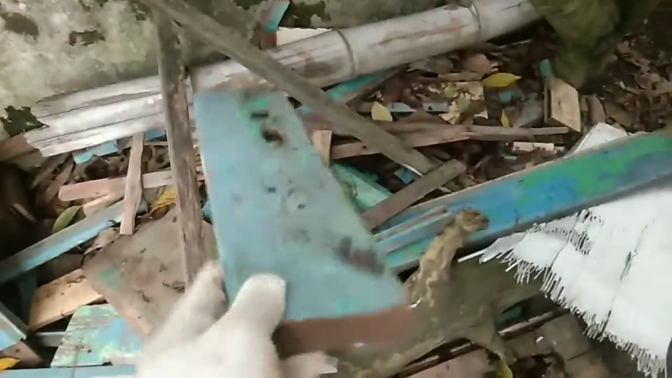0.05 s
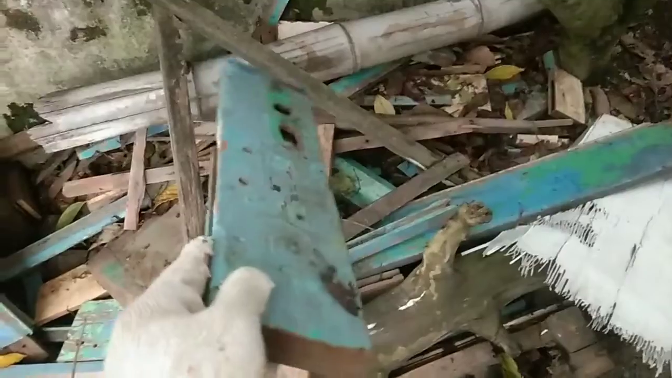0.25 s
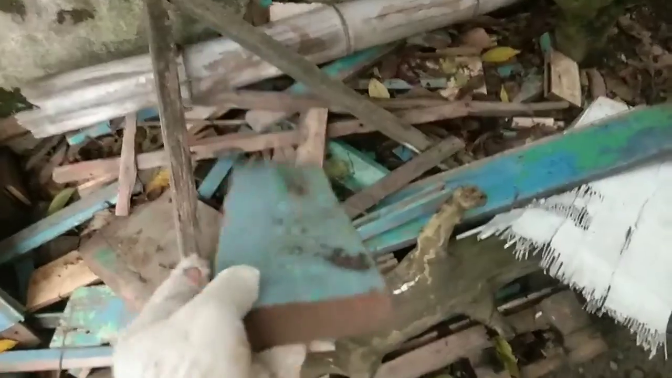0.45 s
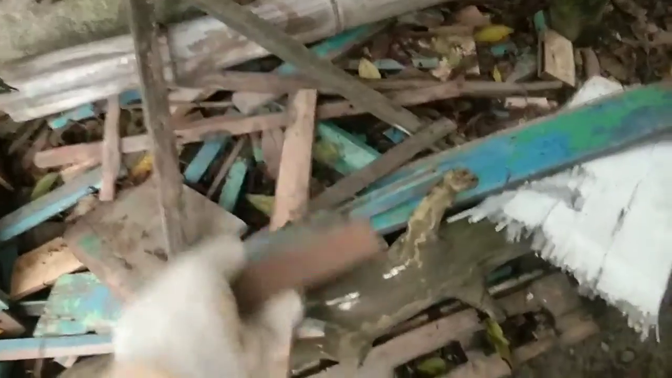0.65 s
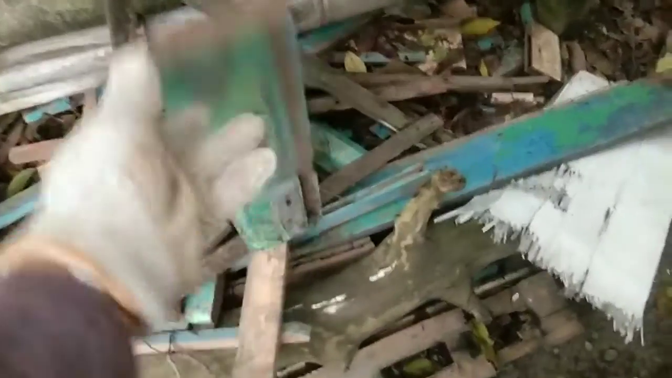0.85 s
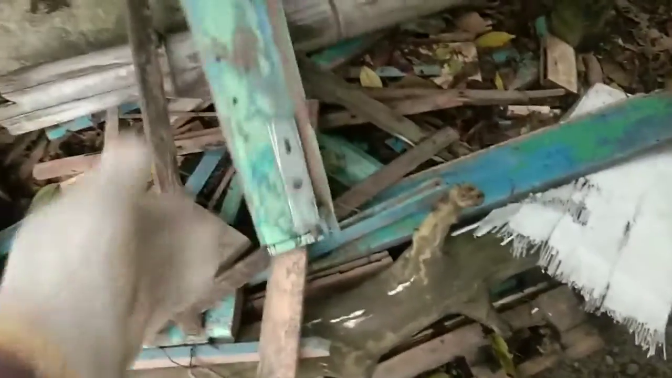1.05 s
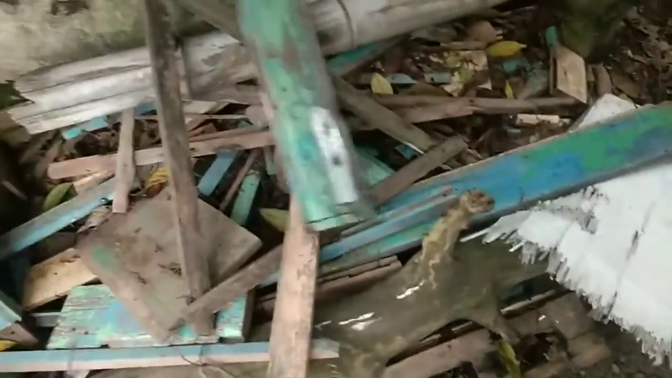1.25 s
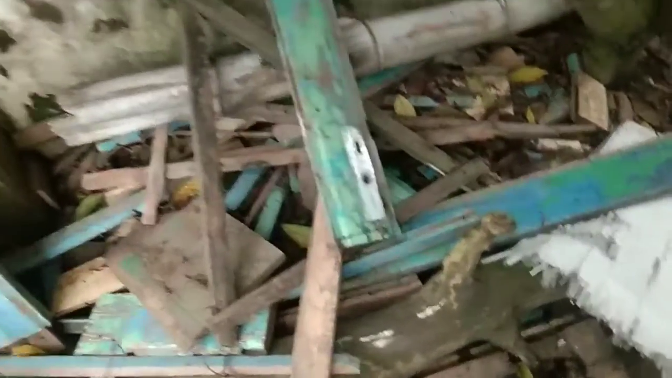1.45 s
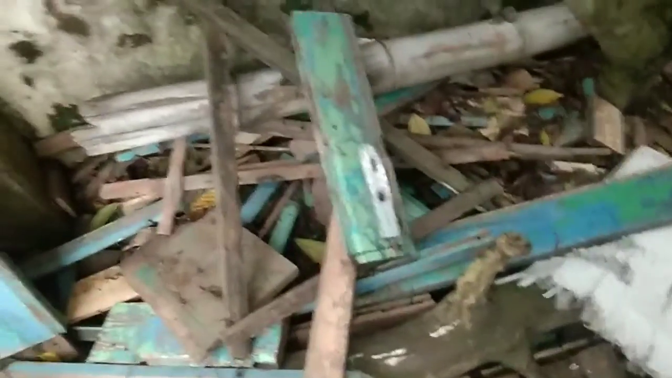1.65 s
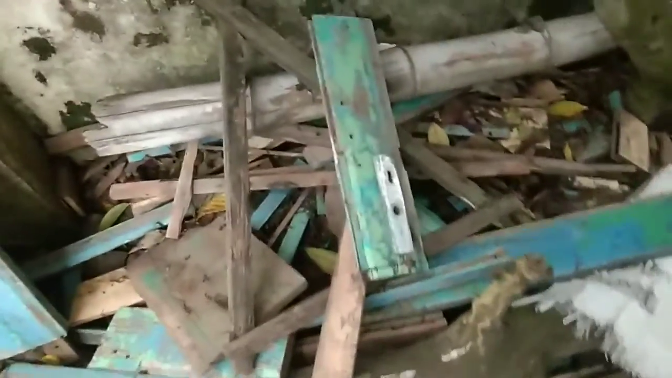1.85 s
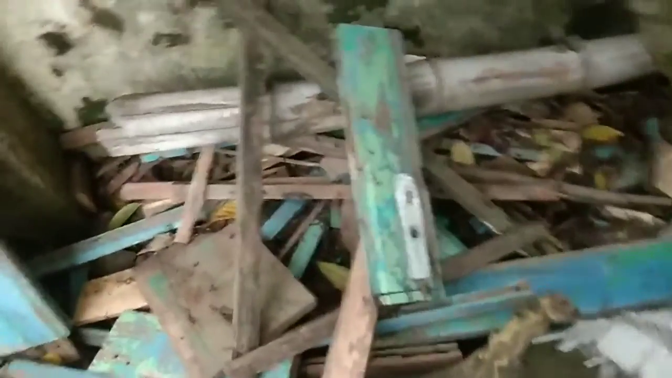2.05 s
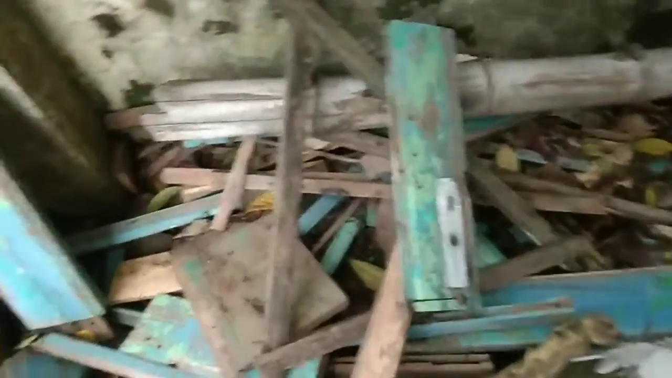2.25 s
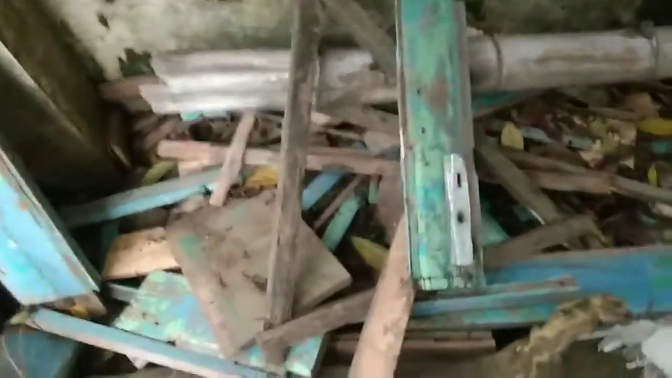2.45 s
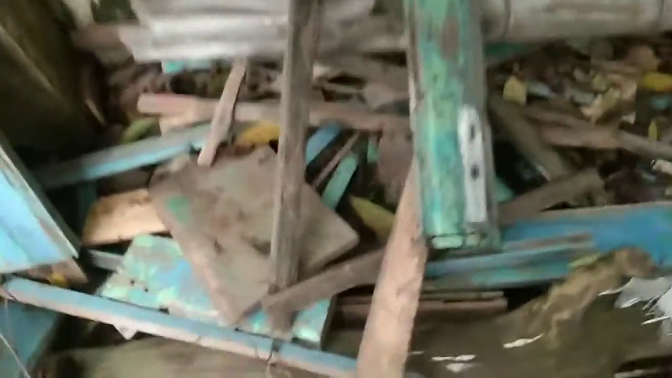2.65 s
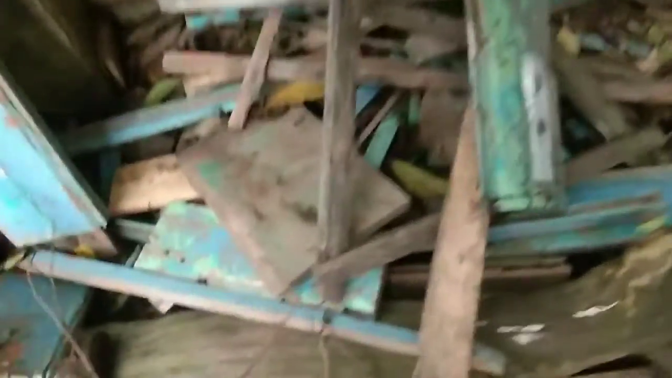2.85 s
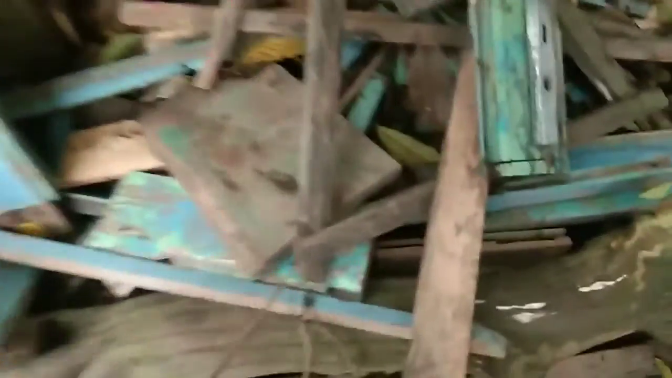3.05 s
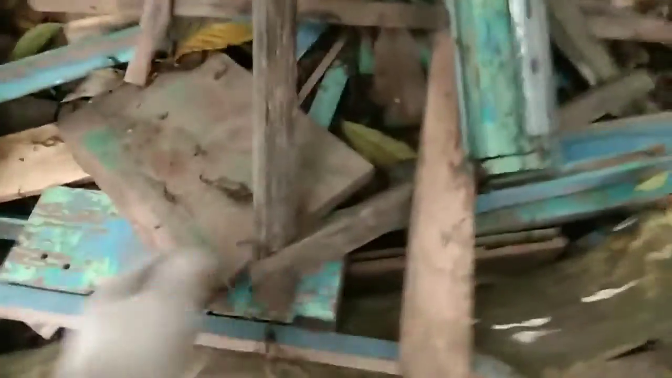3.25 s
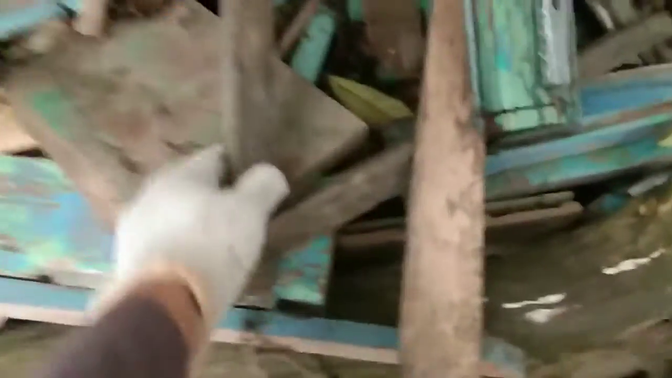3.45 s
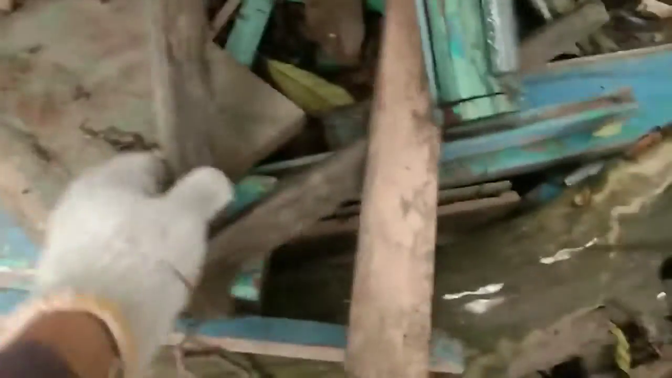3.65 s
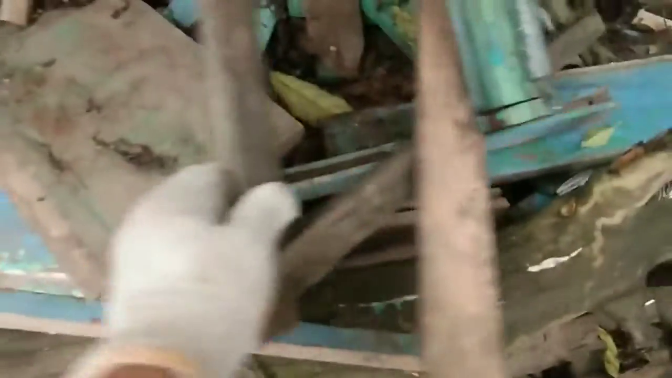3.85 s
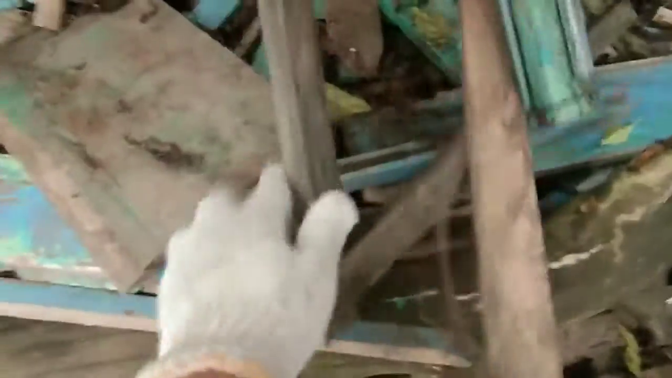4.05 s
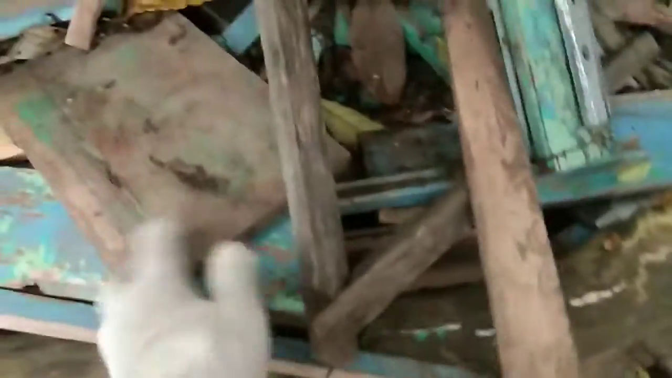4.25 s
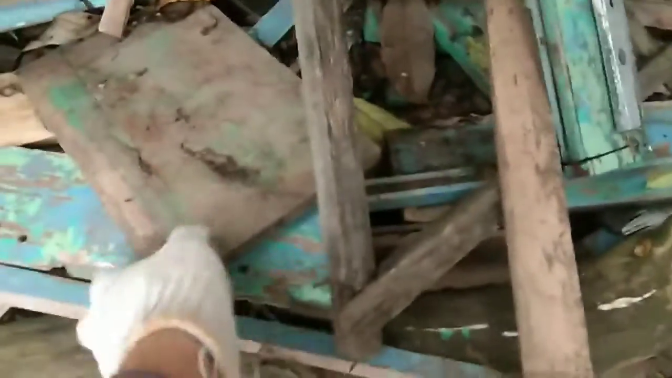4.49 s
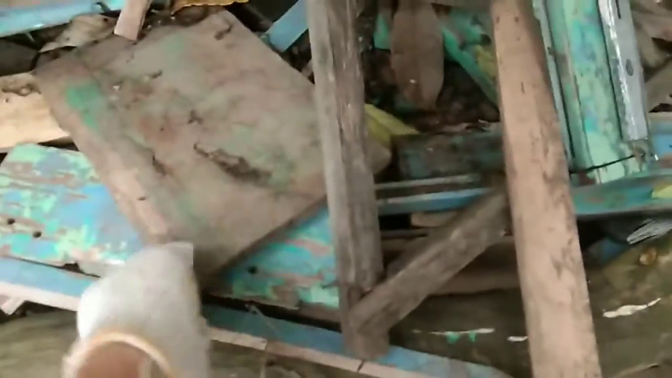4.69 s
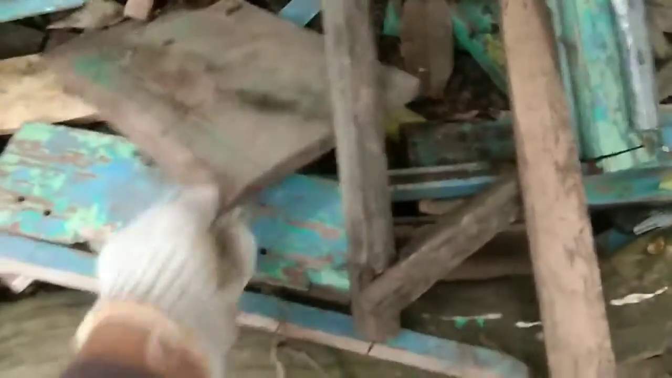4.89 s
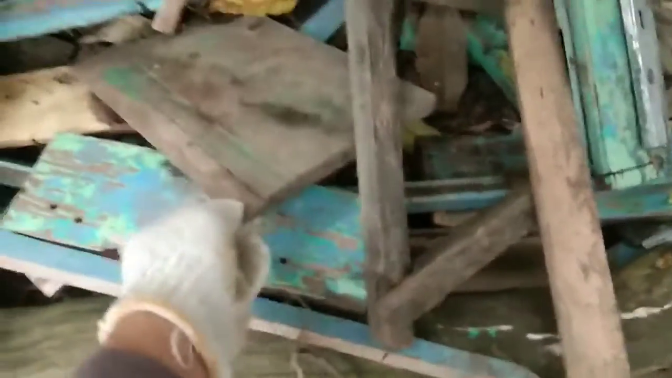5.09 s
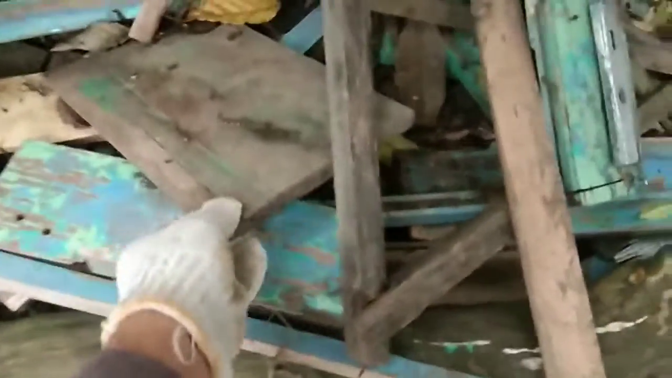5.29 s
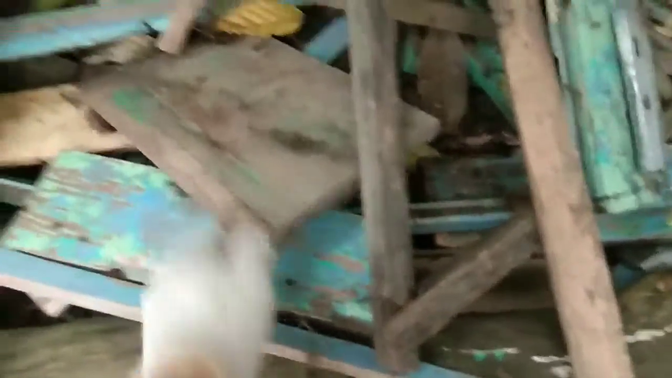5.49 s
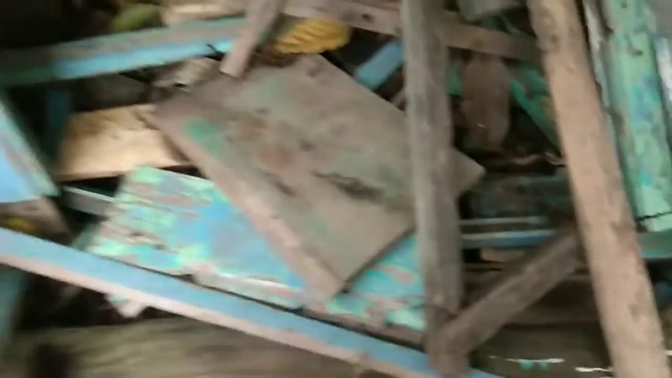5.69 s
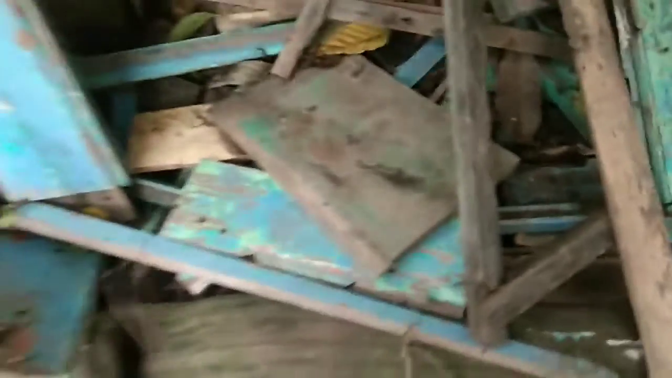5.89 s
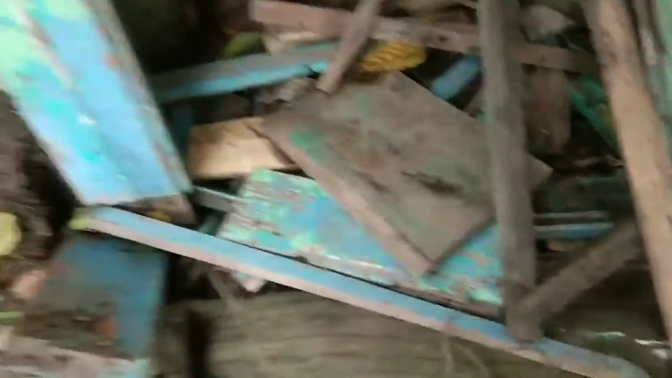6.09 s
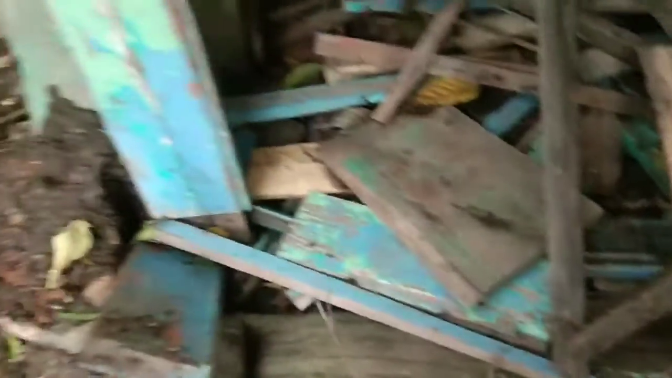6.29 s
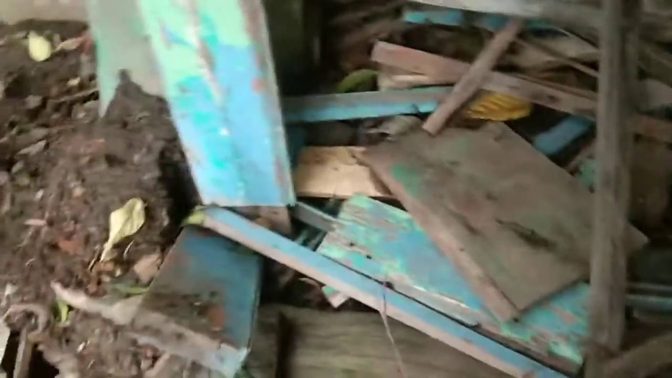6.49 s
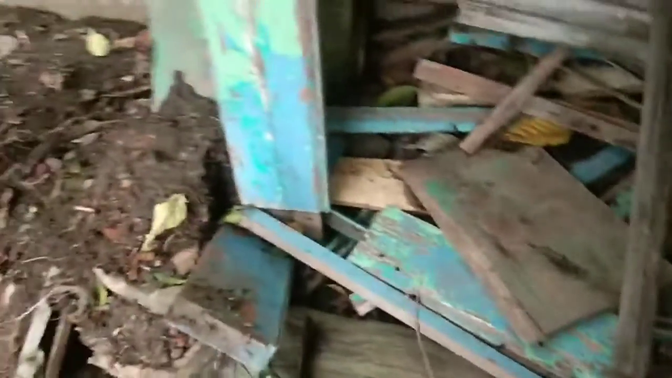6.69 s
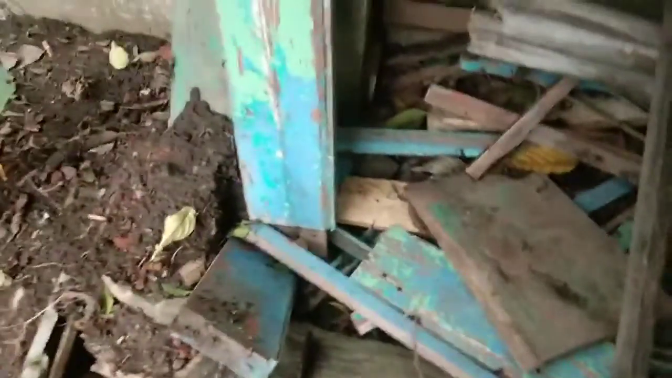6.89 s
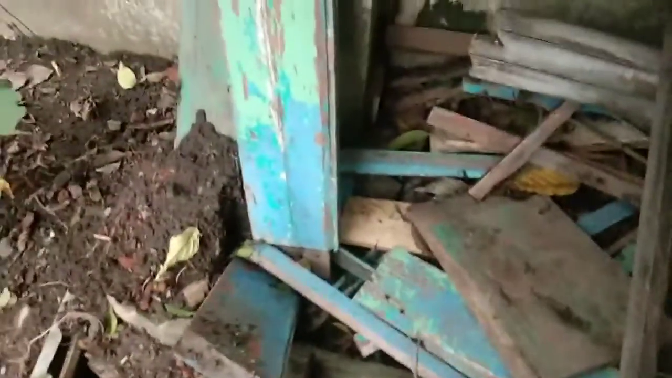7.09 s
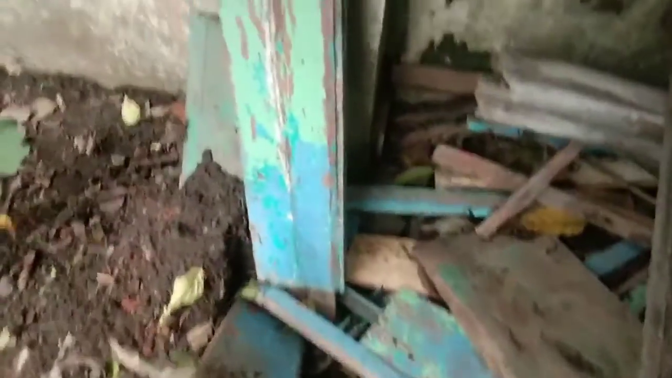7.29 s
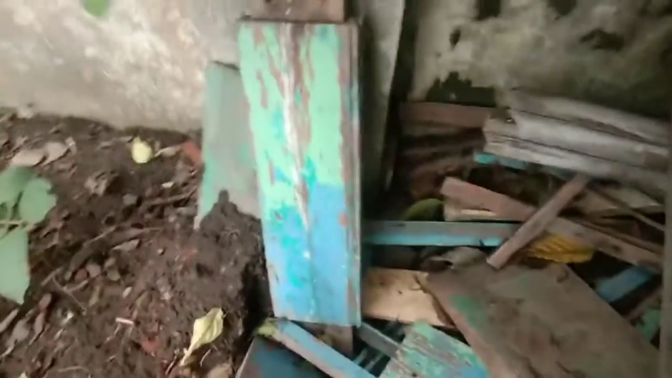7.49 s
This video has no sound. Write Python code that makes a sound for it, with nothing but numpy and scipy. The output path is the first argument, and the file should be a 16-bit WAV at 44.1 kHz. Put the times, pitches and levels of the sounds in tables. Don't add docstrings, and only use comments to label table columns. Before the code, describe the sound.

Old wooden boards clatter onto a heap outdoors, one very loud clack with a loose metal rattle, then thin laths knock, scrape and squeak.

```python
import sys
import numpy as np
from scipy import signal
from scipy.fft import rfft, irfft, next_fast_len
from scipy.io import wavfile
from scipy.ndimage import uniform_filter1d

SR = 44100
rng = np.random.default_rng(int(sys.argv[2]) if len(sys.argv) > 2 else 0)


def rack_gain(trim_db):
    fader = np.asarray(trim_db, float)
    return 10 ** (fader / 20)


def wav_record(signal):
    frames = np.transpose(np.atleast_2d(signal))
    bounded = np.clip(frames, -1, 1)
    quanta = np.round(bounded * 32767).astype(np.int16)
    wavfile.write(sys.argv[1], SR, quanta)


N = 332324


def evened(x):
    return x / np.sqrt(np.mean(x ** 2) + 1e-20)


def add(mix, start_s, sound):
    part = mix[round(start_s * SR):][:len(sound)]
    part += sound[:len(part)]


def colour(x, points):
    point_hz, level_db = np.transpose(points)
    size = next_fast_len(len(x))
    hz = np.fft.rfftfreq(size, 1 / SR) + 1
    gain = rack_gain(np.interp(np.log(hz), np.log(point_hz), level_db, left=-70, right=-70))
    return evened(irfft(rfft(x, size) * gain, size)[:len(x)])


def curves(rows):
    start_s, *columns = np.transpose(rows)
    return [np.interp(np.arange(N) / SR, start_s, column) for column in columns]


def lumps(ms, depth_db):
    width = round(ms * SR / 1000)
    smooth = uniform_filter1d(uniform_filter1d(rng.standard_normal(N), width), width)
    return evened(rack_gain(depth_db * evened(smooth)))


def high_pass(x, hz):
    return signal.sosfilt(signal.butter(2, hz, "high", fs=SR, output="sos"), x)


def ring(modes, stretch, scatter_db, rise_ms, detune=0, waver_db=0):
    hz, level_db, t60_s = np.transpose(modes)[:, :, None]
    t = np.arange(round(.3 * SR)) / SR
    luck = rng.standard_normal((len(modes), 3))
    turns = hz * (1 + detune * luck[:, 2:]) * t
    fade = rack_gain(level_db + scatter_db * luck[:, :1] - 60 * t / (t60_s * stretch))
    tones = fade * np.sin(2 * np.pi * turns + 0.37 * luck[:, 1:2])
    if waver_db:
        speed, start = rng.random((len(modes), 2)).T[:, :, None]
        tones = tones * rack_gain(waver_db * np.sin(2 * np.pi * ((15 + 35 * speed) * t + start)))
    return tones.sum(0) * (1 - np.exp(-1000 * t / rise_ms))


# pitch_hz, width_hz, level_db
PORT = [(2180, 450, -2), (7440, 1030, 8)]


def port(x):
    out = x.copy()
    for hz, width_hz, level_db in PORT:
        out += rack_gain(level_db) * signal.lfilter(*signal.iirpeak(hz, hz / width_hz, SR), x)
    return out


# pitch_hz, level_db (per Hz)
RUB = [(700, -9.5), (1300, -2), (2200, 6), (3200, -6.5), (4600, -17)]
# pitch_hz, level_db (per Hz)
GRIT = [(2500, -19), (4000, 2.5), (6000, 2.5), (8500, -1.5), (10000, -6), (12500, -6), (15500, -11)]


def knock(peak_db, modes, grit_db, stretch, rise_ms, crunch_db=-8, crunch_s=0.086, grit_s=0.064):
    body = ring(modes, stretch, 1.0, rise_ms, detune=0.012)
    t = np.arange(len(body)) / SR
    rough, dust, grains = rng.standard_normal((3, len(body)))
    crunch = colour(rough, RUB) * rack_gain(crunch_db - 60 * t / (crunch_s * stretch))
    crumbs = rack_gain(2.9 * evened(uniform_filter1d(grains, size=60)))
    grit = colour(dust * crumbs, GRIT) * rack_gain(grit_db - 60 * t / (grit_s * stretch))
    settling = 1 - np.exp(-1000 * t / (3.04 * rise_ms))
    sound = port(body / abs(body).max() + (crunch + 0.5 * grit) * settling)
    return rack_gain(peak_db) * sound / abs(sound).max()


# start_s, peak_db, grit_db, tilt_db (treble tilt per octave)
CAUGHT = [
    (0.955, -5.5, -26, 4),
    (.9585, -11.5, -26, 0),
    (1.034, -28.5, -8, 3),
    (3.875, -20.5, -15, -3),
]
TOSSED = [(1.2515, -26, 10, 8), (1.2535, 7.5, -21, 0), (1.2595, -4.5, -7.5, 0), (1.266, -3.5, 2, 1),
          (1.2758, 4, -15, 3), (1.2795, 5, -24, -6), (1.288, -19, 9, -2), (1.292, -9, -8, 8),
          (1.296, -12, 0, 15), (1.304, -10, -5, 7), (1.314, -12, -13, 6), (1.32, -12.5, -24, -6),
          (1.346, -11, -22, 3), (1.353, -15, -8, 4), (1.361, -19, -18, -2), (1.384, -22, -21, -1),
          (1.409, -23, -18, -6), (1.434, -31, -11, 7)]
DROPPED = [(4.194, -20, -5, 12), (4.204, -20, -5, 14), (4.216, -22, -12, 16), (4.229, -14, -9, 16),
           (4.234, -15, -19, 5.5), (4.2415, -20, 8, 10), (4.2465, -2.5, -10.5, -3.5), (4.2525, -18, -14, 6),
           (4.259, -22, -14, 7), (4.267, -21, -2, 11), (4.276, -22, 4, -2), (4.283, -24, 2, 14),
           (4.29, -33, -2, 11), (4.299, -29, -10, 21), (4.317, -18.5, -13, 6), (4.325, -22, -12, 12),
           (4.343, -19.5, -25, -2.5), (4.347, -19, -25, 5), (4.352, -20.5, -25, 2), (4.381, -24, -12, 18),
           (4.388, -24, -12, 27), (4.405, -31, -12, 20)]
# pitch_hz, level_db, t60_s (time to fade by 60 dB)
CAUGHT_MODES = [(804, -13, 0.06), (927, -6, 0.065), (1350, -0.5, 0.046), (1530, -1, 0.032),
                (1950, -25, 0.019), (2200, 1.5, 0.023), (2700, -10, .03), (3200, -14, .02)]
TOSSED_MODES = [(500, -13, 0.042), (800, -13, 0.05), (915, -2.5, 0.044), (995, -4, 0.056),
                (1180, -11, 0.06), (1337, 3.5, 0.02), (1720, -3.5, 0.029), (1860, -5, .04),
                (2150, -2.5, 0.052), (2400, -5, 0.025), (2690, -8, 0.036), (2955, -8, 0.04),
                (3240, -10, 0.04), (3740, -16, 0.04)]
DROPPED_MODES = [(250, -10, 0.056), (528, -2, 0.029), (647, 12, 0.028), (964, 0, 0.077),
                 (1242, -1.5, 0.077), (1815, 0, 0.034), (2200, -8, 0.051), (2466, -11, 0.045),
                 (3180, -30, 0.022)]


def boards():
    out = np.zeros(N)
    choke_start_s, choke_db = 0.0074, -9
    for rows, modes in (CAUGHT, CAUGHT_MODES), (TOSSED, TOSSED_MODES), (DROPPED, DROPPED_MODES):
        for start_s, peak_db, grit_db, tilt_db in rows:
            tilted = [(hz, level_db + tilt_db * np.log2(hz / 1000), t60_s) for hz, level_db, t60_s in modes]
            stretch = max(0.53 + 0.0071 * peak_db, .2)
            sound = knock(peak_db, tilted, grit_db, stretch, rise_ms=1.0)
            flat = np.clip((np.arange(len(sound)) / SR - choke_start_s) / .002, 0, 1) * (peak_db > 0)
            add(out, start_s, sound * rack_gain(choke_db * flat))
    return out


# pitch_hz, level_db, t60_s
HOLLOW = [(312, 3.5, 0.038), (528, 10, 0.032), (700, 4.5, 0.048), (820, 4.5, 0.04)]


def lath(hz, hollow_db):
    series = (.62, -15), (1.0, 2.5), (1.29, -28), (1.52, -10)
    body = [(hz * ratio, level_db, .05) for ratio, level_db in series]
    return body + [(gap_hz, level_db + hollow_db, t60_s) for gap_hz, level_db, t60_s in HOLLOW]


# start_s, peak_db, pitch_hz, grit_db, hollow_db
KNOCKS = [(0.177, -35, 2220, -21, 7), (0.509, -44, 2100, -5, -6), (.907, -31, 2150, -14, -9),
          (.92, -36, 2250, -10, -23), (0.94, -24, 2240, -10, -23), (3.521, -22.5, 2120, -10, -38),
          (3.761, -21, 1944, -18, -16), (3.814, -26, 1260, -26, -8), (3.853, -23, 2150, -14, -17),
          (3.895, -29, 2100, -10, -31), (4.848, -28.5, 2080, -9, -14), (4.865, -27, 2320, -8, -21),
          (4.986, -25, 2000, -10, -4), (5.049, -24.5, 2030, -18, 3), (5.056, -37, 1500, -18, 3),
          (5.125, -23, 2060, -4, -40), (5.461, -25.5, 2020, -1.5, -26), (5.64, -33, 2010, 6, -14),
          (5.668, -21.5, 2150, -10, -2), (5.684, -17.5, 2110, -6, -16), (5.6915, -19, 2290, -12, -4),
          (5.6972, -28, 1450, -15, -3), (5.703, -32, 2150, -16, 6)]


def knocks():
    out = np.zeros(N)
    for start_s, peak_db, hz, grit_db, hollow_db in KNOCKS:
        stretch = max(0.58 + 0.02 * (peak_db + 21), .2)
        rise_ms = 0.6 * rack_gain(-0.4 * (peak_db + 18))
        add(out, start_s, knock(peak_db, lath(hz, hollow_db), grit_db, stretch, rise_ms, crunch_db=-7))
    return out


# start_s, peak_db, grit_db
TICKS = [(0.117, -41, -18), (0.873, -36, 12), (1.504, -35, -16), (1.619, -31, 4), (1.635, -37, 14),
         (1.664, -35, 7), (1.69, -32.5, 7), (1.747, -35, -21), (1.788, -39, -5), (1.893, -36.5, 18),
         (2.09, -35, 1), (2.821, -36, -17), (3.573, -31.5, 0), (3.787, -33, -9), (3.974, -35, 3),
         (4.093, -34, -7), (4.137, -31.5, -17), (4.162, -27, -14), (4.428, -32.5, -19), (4.802, -33, 4),
         (5.164, -34, 3), (5.348, -35.5, -19), (5.611, -35, 8), (5.912, -38.5, -16), (6.382, -37, 4),
         (6.519, -41, 20)]


def ticks():
    out = np.zeros(N)
    for start_s, peak_db, grit_db in TICKS:
        modes = lath(2200 * (1 + .04 * rng.standard_normal()), hollow_db=-19)
        add(out, start_s, knock(peak_db, modes, grit_db, stretch=1.1, rise_ms=2.2, crunch_db=-1.0))
    return out


# start_s, peak_db, pitch_hz
PINGS = [(4.9345, -30, 2300), (4.945, -34, 2350), (4.955, -31, 2300), (4.961, -27, 1990),
         (4.966, -29, 1990), (4.972, -28, 2000), (4.978, -32, 2000), (4.9852, -17, 2010),
         (4.991, -24.5, 2010), (4.998, -27, 2000), (5.003, -31, 1990), (3.51, -35, 2200),
         (3.529, -31, 2150), (5.043, -34, 2400), (5.072, -34, 2200), (5.523, -33, 2200), (5.528, -31, 2150),
         (5.5375, -23, 2180), (5.544, -26, 2230), (5.549, -31, 2200), (5.554, -30, 2250),
         (5.559, -33, 2200), (5.565, -30, 2200), (5.5715, -23, 2220), (5.576, -26, 2200),
         (5.585, -27, 2150), (5.59, -27, 2150), (5.607, -33, 2200), (5.612, -33, 2150)]


def pings():
    out = np.zeros(N)
    for start_s, peak_db, hz in PINGS:
        sound = ring([(hz, 0, .028), (1.62 * hz, -20, .015)], 1, scatter_db=0, rise_ms=1.5)
        add(out, start_s, rack_gain(peak_db) * sound / abs(sound).max())
    return out


# start_s, length_s, pitch_hz, width_hz, level_db
SQUEAKS = [(3.5205, 0.012, 3200, 350, -39), (5.64, .015, 4400, 600, -46), (3.681, 0.03, 620, 200, -45.5),
           (3.71, 0.055, 700, 159, -43), (4.538, 0.036, 2200, 200, -35.5), (4.539, 0.033, 3240, 800, -41),
           (4.547, 0.018, 5960, 500, -48), (4.549, 0.041, 7240, 250, -65), (4.96, 0.05, 2000, 109, -42),
           (5.607, .01, 8500, 400, -48), (5.601, 0.012, 7300, 300, -45), (5.664, 0.005, 7800, 900, -39),
           (3.806, 0.01, 1300, 200, -40), (3.964, 0.018, 594, 500, -43.5), (3.346, 0.0066, 700, 900, -43),
           (0.495, .02, 12500, 4000, -59)]


def squeaks():
    out = np.zeros(N)
    for start_s, length_s, hz, width_hz, level_db in SQUEAKS:
        noise = rng.standard_normal(round(.15 * SR))
        mode = signal.iirpeak(hz, hz / width_hz, SR)
        tone = signal.lfilter(*mode, signal.lfilter(*mode, noise))
        tone = tone[-round(length_s * SR):]
        add(out, start_s, rack_gain(level_db) * evened(tone) * signal.windows.tukey(len(tone), .4))
    return out


# start_s, pressure_db
SLIDE = [(0.0, -56.5), (1.2, -52.5), (1.55, -48), (2.0, -58.5), (2.7, -51.5), (3.3, -56), (3.75, -49),
         (4.13, -48.5), (4.3, -35), (4.51, -53), (5.06, -49), (5.5, -54.5), (6.5, -56), (7.54, -76)]
# start_s, length_s, rub_db, grit_db, groan_db
SCUFFS = [(0.873, 0.072, -46, -48.5, -45), (0.892, 0.029, -47, -43.5, -60), (1.283, 0.18, -35, -44.5, -43),
          (3.853, 0.07, -43, -46, -45.5), (4.188, 0.049, -34, -46, -56), (4.221, 0.018, -34, -53, -39),
          (4.239, 0.19, -63, -65, -46), (4.532, 0.045, -44, -44.5, -75), (4.939, 0.072, -44, -55, -60),
          (2.74, .12, -70, -80, -54), (7.43, .09, -70, -80, -55), (6.88, .08, -70, -80, -57),
          (5.507, 0.13, -45, -51, -70), (5.633, 0.039, -43, -46, -65), (6.674, 0.22, -52.5, -82, -53)]
# pitch_hz, level_db (per Hz)
GROAN = [(300, 6), (520, 2.5), (700, -3), (1000, 0), (1500, -19)]


def slide(slips_per_s=2500, spread_db=2.5):
    size = rack_gain(spread_db * np.minimum(rng.exponential(1, N), 4))
    slips = size * (rng.random(N) < slips_per_s / SR) * rng.choice([-1, 1], N)
    drive = (evened(slips) + 1.33 * rng.standard_normal(N)) * lumps(ms=12.4, depth_db=1.5)
    out = np.zeros(N)
    pressure_db = curves(SLIDE)[0]
    for k, (mix_db, shape) in enumerate([(0, RUB), (-5, GRIT), (-14.5, GROAN)]):
        pressure = rack_gain(pressure_db + mix_db)
        for start_s, length_s, *level_db in SCUFFS:
            add(pressure, start_s, rack_gain(level_db[k]) * signal.windows.tukey(round(length_s * SR), .5))
        out += pressure * evened(port(colour(drive, shape)))
    return out


# pitch_hz, level_db, t60_s
HINGE = [(3230, -8, .2), (4247, 0.5, 0.3), (4868, -6.5, 0.43), (5540, -12, 0.25), (6010, -9, 0.3),
         (6760, -2, 0.1), (6570, -5.5, 0.2), (7150, 2, 0.08), (7492, 0, 0.2), (8125, -5, 0.2),
         (8360, -2.5, 0.2), (10120, -10, 0.1), (10000, -1, 0.13), (10950, -7, 0.14), (12400, -7, .09),
         (12850, -16, .09), (13500, -11, .07), (14650, -14, .07), (15200, -6, .07)]
# start_s, peak_db, centre_hz (tones favoured), free_s (time until damped)
RATTLES = [(0.942, -31, 8400, 0.033), (.94, -29, 7450, .012), (.94, -35, 6760, .012),
           (1.261, -22, 7900, .012), (1.267, -17, 4250, .012), (1.285, -20.5, 4200, .07),
           (1.385, -39, 4250, .015), (1.425, -40, 4250, .04), (1.385, -35, 7900, .03),
           (1.288, -16, 7850, 0.029), (1.288, -25, 10400, 0.087), (1.303, -21, 4950, 0.062),
           (1.323, -18, 7300, 0.085), (1.335, -24.5, 8400, 0.057), (1.312, -33, 6010, 0.045),
           (1.433, -30.5, 6760, 0.041), (3.853, -27, 8400, 0.013), (3.855, -30, 6760, .015),
           (3.875, -31, 7800, .03), (3.885, -40, 3300, .04), (3.922, -37, 7050, .02),
           (3.854, -37, 13300, 0.025), (3.855, -35, 5500, 0.022), (3.883, -38, 5000, .04),
           (3.877, -35, 7500, .015), (3.88, -44, 10500, .03), (3.895, -26.5, 7150, 0.018),
           (4.231, -22, 8400, .008), (4.304, -29, 7000, .03), (4.2266, -16.5, 7150, 0.008),
           (4.2511, -16.5, 7560, 0.032), (4.229, -31, 14000, .03), (4.254, -34, 10500, .05),
           (4.252, -35, 14800, .015), (4.256, -29, 6000, 0.04), (4.259, -29, 5100, .04),
           (4.266, -38, 4250, .02), (4.265, -38, 3230, .03), (4.29, -32, 4250, 0.012),
           (4.318, -38, 4700, .015), (4.305, -33, 8150, .03), (4.285, -27, 8100, 0.051),
           (4.36, -32, 6900, .012), (4.379, -30.5, 6850, 0.022)]


def hinge():
    out = np.zeros(N)
    for start_s, peak_db, centre_hz, free_s in RATTLES:
        struck = [(hz, level_db - 45 * abs(np.log2(hz / centre_hz)), t60_s) for hz, level_db, t60_s in HINGE]
        sound = ring(struck, 1, scatter_db=2.5, rise_ms=.8, waver_db=3)
        damped = rack_gain(-1100 * np.maximum(np.arange(len(sound)) / SR - free_s, 0))
        chatter = rack_gain(1.6 * evened(uniform_filter1d(rng.standard_normal(len(sound)), size=260)))
        sound = sound * chatter
        add(out, start_s, rack_gain(peak_db) * damped * sound / abs(sound).max())
    return out


def pile(x, t60_s=0.18, delay_s=0.0034):
    t = np.arange(round(.3 * SR)) / SR
    hit = rng.random(len(t)) < 3000 / SR
    taps = rng.choice([-1., 1.], len(t)) * hit * rack_gain(-60 * t / t60_s) * (t > delay_s)
    return signal.oaconvolve(x, taps / np.linalg.norm(taps))[:N]


# start_s, peak_db, pitch_hz
BUMPS = [(0.021, -30, 178), (0.092, -21, 129), (0.463, -32, 200), (0.534, -18.5, 217), (0.685, -16.5, 123),
         (.854, -28, 129), (1.251, -13.5, 120), (1.776, -29, 158), (1.976, -25.5, 148), (2.127, -23.5, 200),
         (2.289, -21.5, 171), (3.347, -20, 111), (4.348, -21, 201), (5.675, -19, 129), (5.688, -22, 192),
         (5.711, -24, 171)]


def bumps():
    out = np.zeros(N)
    for start_s, peak_db, hz in BUMPS:
        modes = [(hz, -.1, .07), (2.18 * hz, -8, .05), (3.8 * hz, -18, .03)]
        add(out, start_s, rack_gain(peak_db) * ring(modes, 0.72, scatter_db=2.0, rise_ms=4.1))
    return out


# start_s, gust_db, across_db (flutter over rumble as the camera turns)
WIND = [(0.0, -41, 9), (0.35, -46.5, 7.5), (0.61, -43, 12), (0.78, -40.5, 6), (1.43, -46, 8.5),
        (1.9, -50, 5), (2.25, -44.5, 7), (2.45, -48, 6), (2.83, -44, -6), (3.61, -47, -5.5), (4.3, -44, -6),
        (4.68, -46, -11.5), (4.93, -40.5, -7.5), (5.25, -43.5, -7), (5.71, -47, -2.5), (6.4, -48.5, -5),
        (6.74, -46, -8), (7.54, -44.5, -7)]
# pitch_hz, level_db (per Hz)
RUMBLE = [(18, -27), (45, -12.5), (68, 2), (110, -3.5), (160, -14.5), (300, -25)]
FLUTTER = [(70, -6), (130, 1), (200, 0), (300, -6), (450, -15), (800, -28)]


def wind():
    gust_db, across_db = curves(WIND)
    rumble = colour(rng.standard_normal(N) * lumps(ms=114, depth_db=1.5), RUMBLE)
    flutter = colour(rng.standard_normal(N) * lumps(ms=27.0, depth_db=2.1), FLUTTER)
    return rack_gain(gust_db - across_db / 2) * rumble + rack_gain(gust_db + across_db / 2) * flutter


# pitch_hz, level_db (per Hz)
YARD = [(210, -1), (350, -4), (619, -5), (703, -5.5), (1110, -8), (1280, -7.5), (1660, -5.5), (2200, 2.5),
        (2750, -9.5), (3030, -11), (3780, -10), (5800, -13), (7590, -8), (9180, -25), (15500, -34)]
# start_s, length_s, start_hz, end_hz, level_db
FAR = [
    (0.616, 0.1, 676, 670, -51.5),
    (0.618, 0.11, 1006, 988, -52.5),
    (1.054, 0.1, 978, 913, -51.5),
    (6.77, .055, 5850, 6050, -52),
    (6.84, .035, 6700, 6900, -52),
]


def yard():
    breeze = lumps(ms=30, depth_db=.3)
    out = rack_gain(-46) * colour(rng.standard_normal(N) * breeze, YARD)
    for start_s, length_s, start_hz, end_hz, level_db in FAR:
        hz = np.linspace(start_hz, end_hz, round(length_s * SR))
        tone = np.sin(2 * np.pi * np.cumsum(hz) / SR)
        add(out, start_s, rack_gain(level_db) * tone * signal.windows.tukey(len(hz), .5))
    return out


def stray_treble(mid, share_db=-4.0, per_s=1.8, octaves=.35):
    hz, t, z = signal.stft(mid, SR, nperseg=512)
    when, where = rng.random((round(per_s * N / SR), 2)).T
    low_hz = 4700 + where * (9600 - 4700)
    overload = 1.262, 4700, 12000
    bands = [overload, *zip(when * N / SR, low_hz, low_hz * 2 ** octaves)]
    inside = sum((abs(t - s) < .012) * ((hz > lo) & (hz < hi))[:, None] for s, lo, hi in bands)
    phase = np.exp(2j * np.pi * rng.random(z.shape[::-1]).T)
    z = rack_gain(share_db) * np.minimum(inside, 1) * abs(z) * phase
    return signal.istft(z, SR, nperseg=512)[1][:N]


def scene():
    hits = high_pass(boards() + knocks() + ticks() + hinge() + squeaks() + pings(), 110)
    thuds = high_pass(bumps(), 75)
    mono = hits + rack_gain(-12.0) * pile(hits) + thuds + slide() + wind() + yard()
    return np.tile(mono, (2, 1))


def band_limit(x):
    return signal.sosfilt(signal.butter(12, 15660, fs=SR, output="sos"), x)


def record(dry):
    wide = dry + stray_treble(np.clip(dry[0], -1, 1)) * [[1], [-1]]
    return band_limit(np.clip(wide, -.97, .97))


dry = scene()
out = record(dry)
wav_record(out)
```